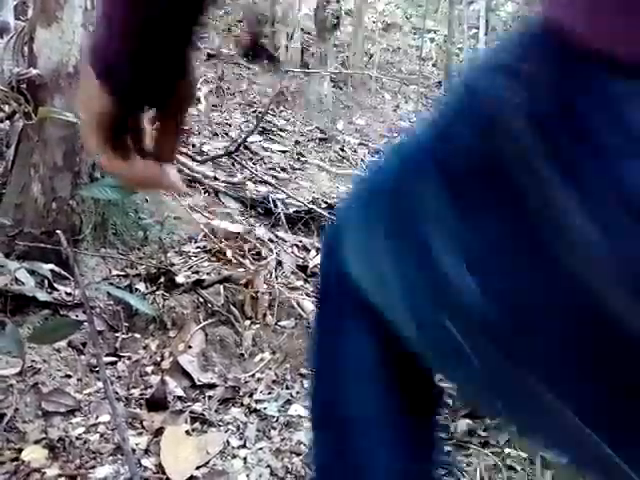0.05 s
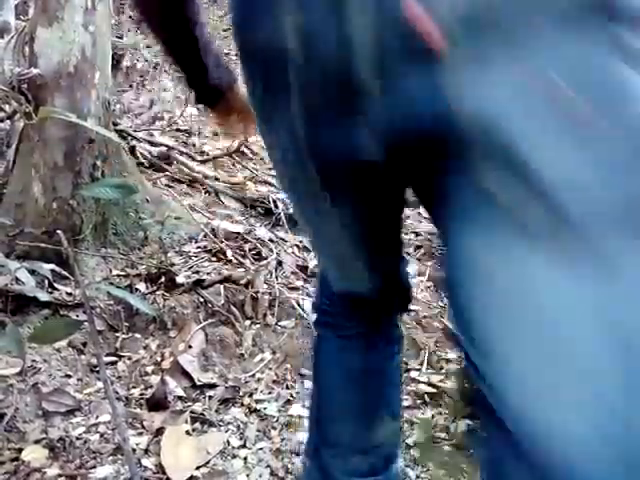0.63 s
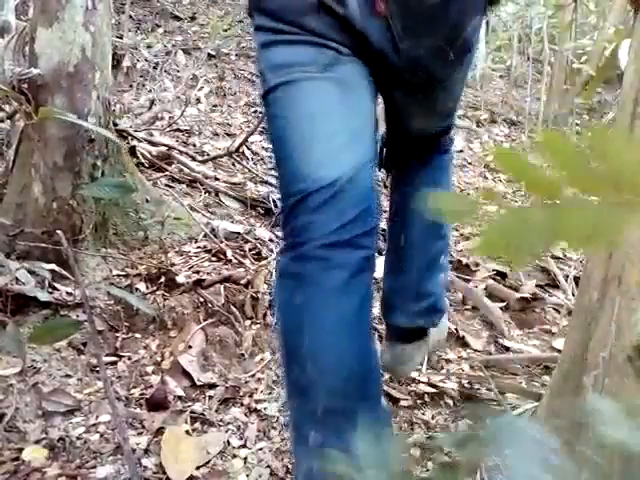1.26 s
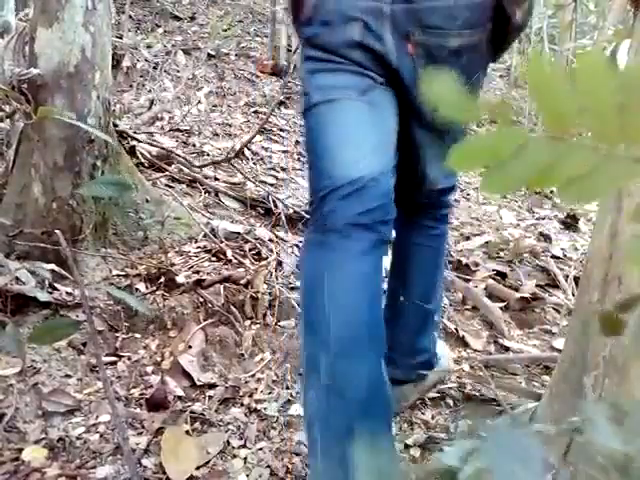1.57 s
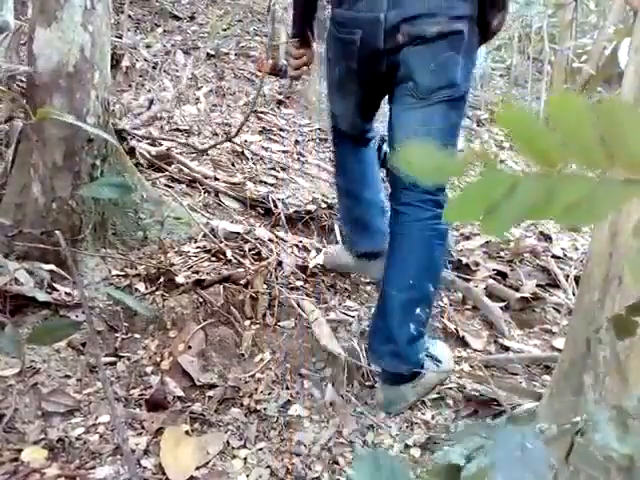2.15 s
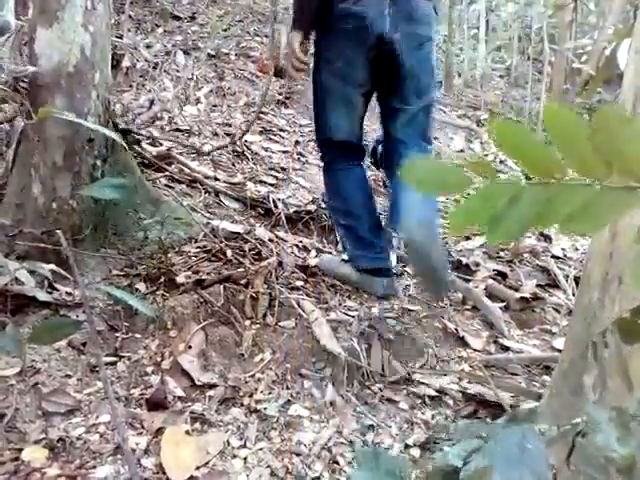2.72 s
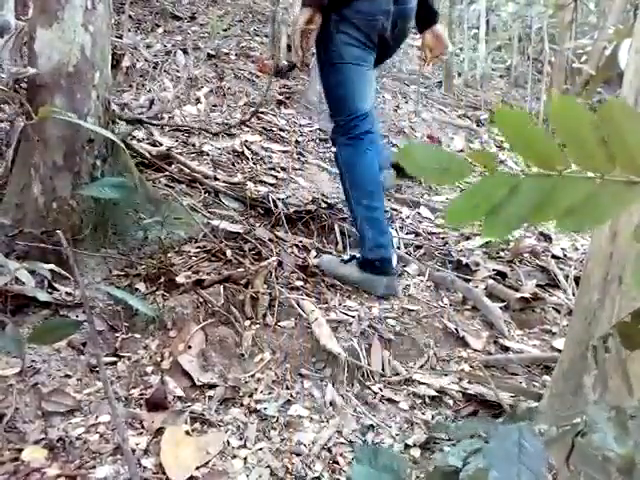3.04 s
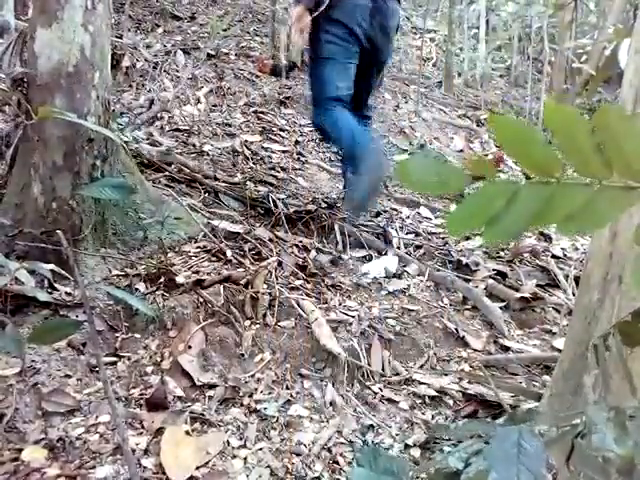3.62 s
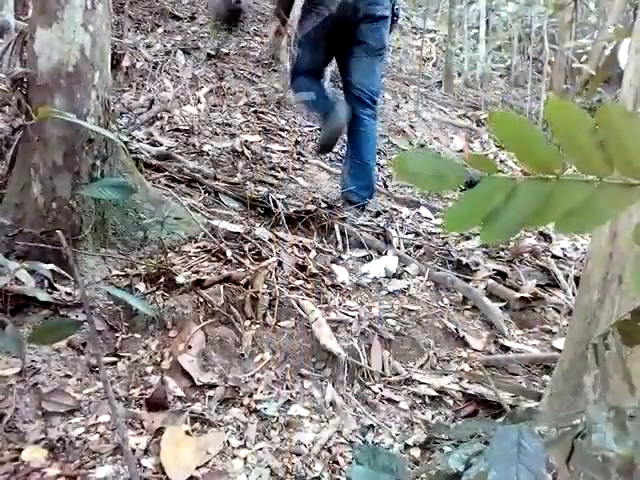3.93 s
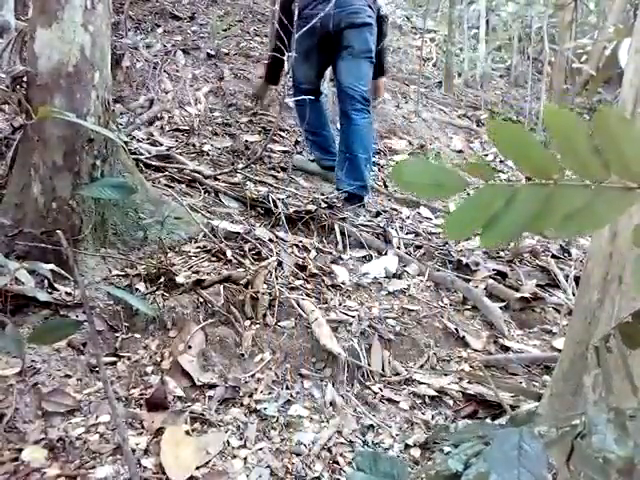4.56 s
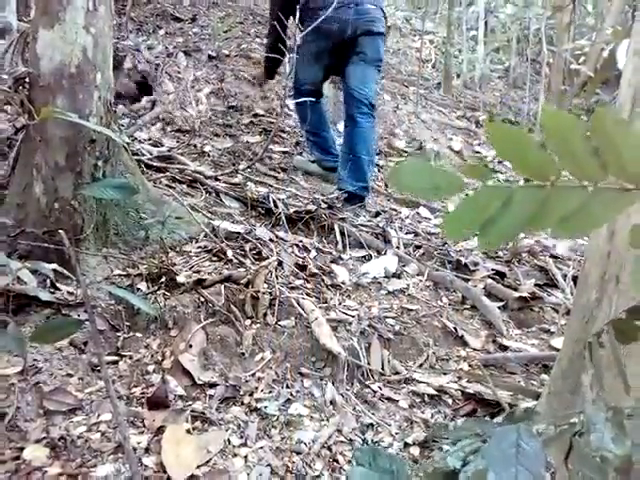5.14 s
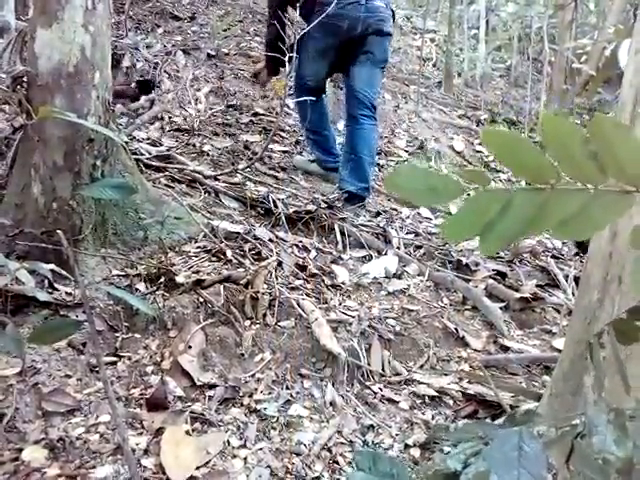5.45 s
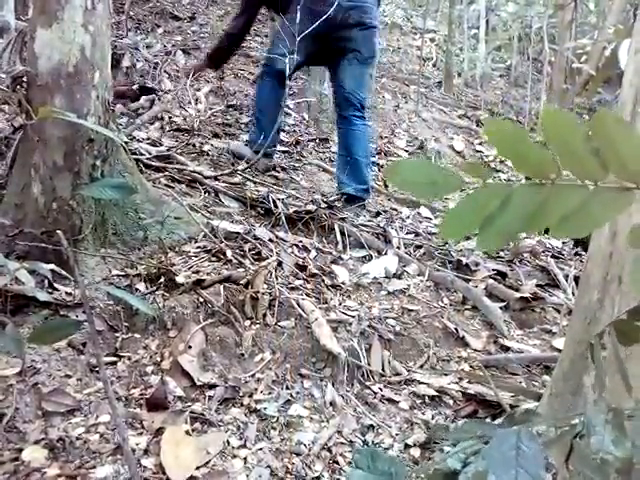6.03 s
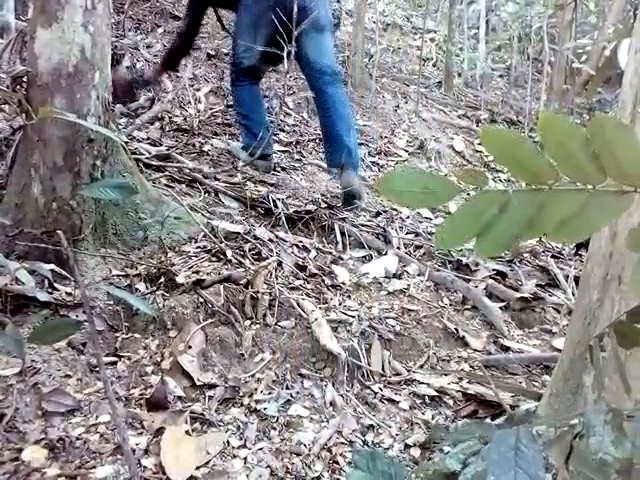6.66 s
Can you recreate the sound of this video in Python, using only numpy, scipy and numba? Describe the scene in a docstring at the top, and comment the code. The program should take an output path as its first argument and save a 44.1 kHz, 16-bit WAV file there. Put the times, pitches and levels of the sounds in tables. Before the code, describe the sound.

In a forest with a faint, steady insect hiss and thin whistling notes, a bird squawks once amid low rushes of air from wings and passing legs. Close footsteps crush dry leaves and break twigs, loudest in the first second, then recede into light rustles and occasional snaps. The bird carries on with short, quick alarm clucks almost to the end. One microphone picks it all up, with a thin echo off the trunks.

```python
"""Forest slope: a snared wild fowl squawks, beats its wings, then clucks in alarm while someone
strides past and up close through dry leaves and twigs. The voice is syrinx pulses through throat
resonances; the litter is tiny fractures, snaps and dull blows; wings and legs push low gusts.
Insects hiss and whistle; the trunks give a thin echo. One microphone."""
import sys
import numpy as np
from scipy import signal
from scipy.fft import rfft, irfft
from scipy.io import wavfile
from scipy.ndimage import uniform_filter1d
from numba import njit

SR = 44100
rng = np.random.default_rng(int(sys.argv[2]) if len(sys.argv) > 2 else 0)


def store_wav(level_fs):
    """Save 16-bit WAV to argv[1]."""
    pcm = np.round(np.clip(np.atleast_2d(level_fs), -1, 1) * 32767)
    wavfile.write(sys.argv[1], SR, pcm.T.astype(np.int16))


N = 298998

# alarm calls: middle_s, relative_db, brightness_db
CLUCKS = [(1.08, -38.5, 12), (1.239, -44.0, -1), (1.369, -46.5, 1.5), (1.606, -40.0, 8), (1.896, -43.5, -4),
          (2.096, -45, 0), (2.402, -41.5, 4), (2.582, -39.0, -2), (2.753, -40, 0), (2.965, -38.0, -1),
          (3.166, -40.5, -3), (3.537, -39.0, -1), (3.73, -42.5, 3), (3.913, -42, -2), (4.082, -42.5, 5),
          (4.259, -40.5, -1), (4.457, -41.5, -1), (4.658, -43.0, 0), (5.173, -45.5, -5), (5.385, -43, 0),
          (5.591, -43.0, -1.5), (5.784, -45.5, -4), (5.974, -45.0, -4.5), (6.174, -44.5, -4.5),
          (6.378, -45, -4)]
# syrinx, beak shut / open: base_hz, effort_hz_per_db, sag_hz_per_s
SHUT_PITCH = (392, 9, 29)
OPEN_PITCH = (266, 3.1, 7.2)
# throat resonances, beak shut / open / squawking: centre_hz, width_hz, gain_db
SHUT_THROAT = [(474, 134, 4.5), (900, 370, 1), (1370, 180, 5.5)]
OPEN_THROAT = [(492, 76, -9.5), (966, 113, 6.5), (1335, 122.4, 2.5), (2470, 127, -13.5), (3960, 300, -9),
               (5390, 310, -8.5)]
SQUAWK_THROAT = [(990, 210, -9.5), (1600, 110, -0.5), (2240, 330, -8), (3130, 200, -11), (4150, 300, 1),
                 (5740, 1000, -8)]
# beak filter: freq_hz, gain_db
SHUT_BEAK = [(150, -34), (300, 19), (1500, 0.5), (2400, -3.5)]
OPEN_BEAK = [(700, -3.5), (1400, -3), (1900, 6), (2800, -1), (5400, 0), (7500, -31)]
# feet and wings sweeping leaves: peak_s, level_db, rise_s, fall_s
SWEEPS = [(.13, -41, 0.18, 0.14), (.58, -33.5, 0.12, 0.31), (.78, -38, 0.28, 0.32),
          (1.159, -41.5, 0.2, 0.15), (1.58, -49.5, 0.43, 0.84), (2.25, -51, 0.099, 0.079),
          (2.53, -49.5, 0.095, 0.048), (3.8, -48.5, 0.71, 0.12), (4.22, -58, 0.88, 0.9)]
# shoes crushing litter: start_s, relative_db, fade_s
CRUNCHES = [(0.464, -26, 0.011), (0.538, -29, 0.015), (0.578, -34, 0.0089), (0.659, -36.5, .025),
            (0.712, -29.5, 0.019), (0.756, -34, 0.02), (0.811, -32.5, 0.053), (1.444, -39, 0.062),
            (2.465, -40.5, 0.041), (3.308, -42, 0.042), (3.678, -45, 0.079)]
# twigs and stiff leaves breaking: start_s, peak_db, body_db
SNAPS = [(0.0466, -18, 1), (0.057, -17, 4), (0.0886, -14, 3), (0.38, -31, 19.5), (.467, -6.5, -1),
         (0.5251, -19, 16.5), (0.5453, -19.5, 15), (.608, -14.5, -1), (.625, -22, 2), (0.6555, -10.5, 9.5),
         (.701, -16, 5), (0.722, -20, 13), (.769, -22, 3), (1.07, -25.5, 0), (1.749, -26, 3),
         (1.8368, -29.5, -32), (2.244, -30.5, 10), (2.5545, -31, 7), (3.894, -28, -3)]
# blows on the ground: start_s, level_db, pitch_hz, grit_db
THUDS = [(.423, -31.5, 320, -1.5), (.474, -29.5, 300, -12), (0.585, -22, 264, -24), (0.62, -21.5, 167, -13),
         (.722, -25, 262, -4), (0.784, -26.5, 240, -9), (2.242, -38.5, 555, -15), (3.33, -41.5, 322, -4),
         (3.726, -39, 191, -3), (6.513, -40, 152, -13.5), (6.563, -28.5, 223, -4.5)]
# air pushed by legs and wings: peak_s, level_db
GUSTS = [(0.051, -40), (.61, -38.5), (.76, -40.5), (3.34, -62), (3.69, -56), (6.54, -51)]
# narrow hisses, among them a short dry insect rasp: peak_s, level_db, rise_s, fall_s, centre_hz,
# filter_width_hz
HISSES = [(3.17, -53.5, 0.08, 0.091, 960, 576), (5.073, -54.5, .012, 0.12, 6000, 1470),
          (6.595, -49.5, 0.055, 0.056, 4760, 1820)]
# insect notes: start_s, end_s, pitch_hz, level_db
WHISTLES = [(-.3, .48, 3100, -54), (.55, 1.05, 3115, -58), (0, 1.7, 2995, -68), (2.6, 4.2, 2995, -66),
            (3.08, 3.46, 3085, -55), (3.6, 4.08, 3105, -55), (5.08, 6.12, 2980, -68),
            (6.12, 7, 2995, -67.5), (5.42, 6.06, 3102, -54), (6.01, 6.5, 3118, -53.5), (6.45, 7, 2905, -61)]
# their partials: harmonic, gain_db
WHISTLE_PARTIALS = [(1, 0.5), (2, -1), (4, -10.5)]
# steady crickets: centre_hz, filter_width_hz, level_db
CRICKETS = [(6400, 12, -65.5), (6574, 47, -63.5)]
# spectra: freq_hz, gain_db
LEAF_SPECTRUM = [(200, -21), (500, -13), (1200, -9.5), (2000, -13), (3100, -9), (4200, -4.5), (5500, 2),
                 (6400, 0.5), (7300, -14), (9000, -26.5), (12500, -40), (15500, -26.5)]
TWIG_SPECTRUM = [(300, -12.5), (1200, -16), (3000, -10.5), (4300, 1), (5600, 8), (6500, 0.5), (7500, -16.5),
                 (10000, -26.5), (15500, -29.5)]
GUST_SPECTRUM = [(25, -58), (60, -7), (120, -2), (250, -6.5), (380, -10), (600, -30.5), (1200, -26.5),
                 (3000, -40)]
CHORUS_SPECTRUM = [(3000, -29), (4200, -27.5), (4650, -3), (5400, -10), (7000, -6), (7700, 2), (9000, -6),
                   (10300, -30.5), (15500, -73)]
RUMBLE_SPECTRUM = [(25, -24), (60, -7.5), (125, -5.5), (300, -13.5), (1000, -26.5), (2000, -31),
                   (4000, -41), (6000, -43)]
SOIL_SPECTRUM = [(120, -14), (330, 0), (700, 2), (1500, -18)]
GRIT_SPECTRUM = [(900, 8), (1600, -4), (3000, -35)]
ECHO_SPECTRUM = [(1400, 0.5), (1800, 6), (4300, 8.5), (10000, -15)]


def clucks(length_s=.052, lead_s=.031, beak_opens_s=2.3, chest_db=-19):
    """Louder clucks are higher; pitch sags as the bird tires; throat resonances arch with each call."""
    out = np.zeros(N)
    first_s, mean_db = CLUCKS[0][0], np.mean(CLUCKS, axis=0)[1]
    for s, db, brightness_db in CLUCKS:
        if s > beak_opens_s:
            pitch, throat, beak, breath = OPEN_PITCH, OPEN_THROAT, OPEN_BEAK, .45
        else:
            pitch, throat, beak, breath = SHUT_PITCH, SHUT_THROAT, SHUT_BEAK, .55
        base_hz, effort_hz_per_db, sag_hz_per_s = pitch
        hz = base_hz + effort_hz_per_db * (db - mean_db) - sag_hz_per_s * (s - first_s)
        source = syrinx(hz, length_s, jitter=.035, breath=breath,
                        rise=rng.uniform(.3, .6), bend=rng.uniform(.12, .36))
        stretch = arch(length_s, bend=.11) * rng.uniform(.97, 1.03)
        voice = sum((-1) ** k * undb(gain_db) * resonate(source, centre_hz * stretch, float(width_hz))
                    for k, (centre_hz, width_hz, gain_db) in enumerate(throat))
        voice = colour(colour(voice, beak), [(700, 0.014), (1350, brightness_db)])
        chest = undb(chest_db) * unit(ring(source, [(246, 350, 0)]))
        add(out, s - lead_s, undb(db - 7) * unit(unit(voice) + chest))
    return out


def squawk(start_s=.107, level_db=-33):
    """One harsh cry of fright: jittery pulses through a stretched throat."""
    out = np.zeros(N)
    source = syrinx(hz=560, length_s=.049, jitter=.2, breath=.56, rise=.21, bend=.2)
    cry = colour(ring(source, SQUAWK_THROAT), [(400, -31), (1000, 2)])
    add(out, start_s, undb(level_db) * unit(cry))
    return out


def syrinx(hz, length_s, jitter, breath, rise, bend):
    """A swell of uneven pulses, slow at first; a puff of air follows each."""
    progress = np.arange(SR // 8) / SR / length_s
    shake, air = rng.standard_normal((2, len(progress)))
    wobble = jitter * unit(uniform_filter1d(shake, size=150))
    cycles = np.cumsum(hz * (arch(length_s, bend) + wobble)) / SR
    pulses = np.diff(np.floor(cycles), prepend=0) * undb(2 * shake)
    puffs = air * (1 - cycles % 1) ** 2
    envelope = np.clip(progress / rise, 0, 1) * np.clip((1 - progress) / .34, 0, 1)
    return envelope * (unit(pulses - pulses.mean()) + breath * unit(puffs))


def leaves(twigs_per_s=56, twig_db=-7.5, soil_db=-19):
    """Swept leaves rustle and small twigs tick; under a shoe, leaves crunch and soil gives way."""
    stir = np.sqrt(sum((undb(db) * swell(s, rise_s, fall_s)) ** 2 for s, db, rise_s, fall_s in SWEEPS))
    rustle = crackle() * undb(3.13 * wander(70))
    breaks = (rng.random(N) < twigs_per_s / SR) * rng.random(N)
    ticks = undb(twig_db) * unit(colour(breaks, TWIG_SPECTRUM))
    weight, t = np.zeros(N), np.arange(SR // 2) / SR
    for s, db, fade_s in CRUNCHES:
        add(weight, s, undb(db + 5) * np.minimum(3 * t / fade_s, 1) * np.exp(-t / fade_s))
    crunch = unit(colour(crackle(), [(1200, 5), (4500, 2)]))
    soil = undb(soil_db) * noise(SOIL_SPECTRUM)
    return stir * (rustle + ticks) + weight * (crunch + soil)


def crackle(cracks_per_s=3000, spread_db=2.5):
    """Tiny leaf fractures, a few much louder than the rest, over a sliding hiss."""
    cracks = (rng.random(N) < cracks_per_s / SR) * rng.choice([-1, 1], N)
    strength = undb(spread_db * np.minimum(rng.exponential(size=N), 4.5))
    hiss = 1.02 * rng.standard_normal(N)
    return unit(colour(unit(cracks * strength) + hiss, LEAF_SPECTRUM))


def snaps(splinter_s=.0014, shiver_s=.044, shiver_db=-21, body_below_hz=3500):
    """A twig splinters sharply; the leaves around it shiver."""
    out, t = np.zeros(N), np.arange(SR // 16) / SR
    envelope = np.exp(-t / splinter_s) + undb(shiver_db) * np.exp(-t / shiver_s)
    for s, peak_db, body_db in SNAPS:
        spectrum = [(hz, db + body_db * (hz < body_below_hz)) for hz, db in TWIG_SPECTRUM]
        snap = colour(rng.standard_normal(len(t)) * envelope, spectrum)
        add(out, s, undb(peak_db) * snap / np.abs(snap).max())
    return out


def thuds(t60_s=.032):
    """Gritty blows that the soil damps at once."""
    out, t = np.zeros(N), np.arange(SR // 8) / SR
    for s, db, hz, grit_db in THUDS:
        grit = undb(grit_db) * noise(GRIT_SPECTRUM, len(t))
        add(out, s, undb(db - 60 * t / t60_s) * (grit - np.sin(2 * np.pi * hz * t)))
    return out


def gusts(rise_s=.052, fall_s=.1):
    """Low rushes of air from wings and passing legs."""
    push = sum(undb(db) * swell(s, rise_s, fall_s) for s, db in GUSTS)
    return noise(GUST_SPECTRUM) * push * undb(2 * wander(60))


def hisses():
    """Brief narrow hisses that swell and trail off."""
    return sum(undb(db) * swell(s, rise_s, fall_s) * narrow_noise(hz, width_hz)
               for s, db, rise_s, fall_s, hz, width_hz in HISSES)


def insect_whistles(flat=.009, settle_s=.303, rise_s=.28, stop_s=.13):
    """Thin notes start flat, swell as they creep up to pitch, then stop short."""
    out, t = np.zeros(N), np.arange(N) / SR
    for start_s, end_s, hz, db in WHISTLES:
        droop = flat * np.exp(-np.maximum(t - start_s, 0) / settle_s)
        pitch_hz = hz * (1 - droop + .00136 * wander(120))
        phase = 2 * np.pi * np.cumsum(pitch_hz) / SR
        tone = sum(undb(gain_db) * np.sin(k * phase) for k, gain_db in WHISTLE_PARTIALS)
        gate = np.clip(np.minimum((t - start_s) / rise_s, (end_s - t) / stop_s), 0, 1)
        out += gate * undb(db + 2 * wander(50)) * tone
    return out


def forest(chorus_db=-55, rumble_db=-66.5):
    """Far insect chorus, faint rumble of air, two cricket notes."""
    chorus = noise(CHORUS_SPECTRUM) * undb(chorus_db + .34 * wander(40) + .74 * wander(2.07))
    rumble = noise(RUMBLE_SPECTRUM) * undb(rumble_db + .94 * wander(8.3))
    crickets = sum(undb(db) * narrow_noise(hz, width_hz) for hz, width_hz, db in CRICKETS)
    return chorus + rumble + crickets


def trunk_echoes(x, gap_s=.011, t60_s=.31):
    """Sparse echoes off trunks; the pattern shifts every 0.2 s as bird and walker move."""
    out, hop = np.zeros(N), SR // 5
    t = np.arange(SR // 2) / SR
    decay = undb(-60 * t / t60_s) * (t > gap_s)
    for i in range(0, N, hop):
        echoes = rng.standard_normal(len(t)) * (rng.random(len(t)) < .05) * decay
        add(out, i / SR, signal.fftconvolve(x[i:i + hop], echoes / np.sqrt(np.sum(echoes ** 2))))
    return colour(out, ECHO_SPECTRUM)


def arch(length_s, bend, crest=.6):
    """Factor rising from 1 - bend to 1 at the crest of a call, then sinking a little."""
    progress = np.minimum(np.arange(SR // 8) / SR / length_s, 1)
    return 1 - np.clip(bend * (progress / crest - 1) ** 2, 0, .5)


def swell(peak_s, rise_s, fall_s):
    """Exponential rise to 1, then decay."""
    t = np.arange(N) / SR - peak_s
    return np.exp(-np.minimum(np.maximum(-t / rise_s, t / fall_s), 20))


def wander(rate_hz):
    """Smooth random drift, rms 1."""
    hold = max(int(SR / rate_hz), 1)
    steps = np.repeat(rng.standard_normal(N // hold + 1), hold)
    return unit(uniform_filter1d(steps, hold)[:N])


def noise(spectrum, samples=N):
    """Coloured noise, rms 1."""
    return unit(colour(rng.standard_normal(samples), spectrum))


def narrow_noise(hz, width_hz):
    """Noise twice through one resonance, rms 1."""
    mode = [(hz, width_hz, 0)]
    return unit(ring(ring(rng.standard_normal(N), mode), mode))


def colour(x, spectrum, size=2048):
    """Minimum-phase filter through points of freq_hz, gain_db."""
    hz, db = np.transpose(spectrum)
    bins_hz = np.arange(size // 2 + 1) * SR / size
    gain = undb(np.interp(np.log(bins_hz + 1), np.log(hz), db))
    cepstrum = irfft(np.log(gain))[:size // 2]
    cepstrum[1:] *= 2
    return signal.fftconvolve(x, irfft(np.exp(rfft(cepstrum, size))))[:len(x)]


def ring(x, modes):
    """Parallel resonances of alternating sign."""
    return sum((-1) ** k * undb(db) * signal.lfilter(*signal.iirpeak(hz, hz / width_hz, SR), x)
               for k, (hz, width_hz, db) in enumerate(modes))


@njit
def resonate(x, hz, width_hz):
    """Band-pass with a moving centre."""
    y, band, low = np.empty(len(x)), 0., 0.
    for i in range(len(x)):
        g, damping = np.tan(np.pi * hz[i] / SR), width_hz / hz[i]
        v = (band + g * (x[i] - low)) / (1 + g * (g + damping))
        band, low, y[i] = 2 * v - band, low + 2 * g * v, damping * v
    return y


def undb(db):
    """Decibels to gain."""
    return 10 ** (np.asarray(db) / 20)


def unit(x):
    """Scale to rms 1."""
    return x / np.sqrt(np.mean(x ** 2) + 1e-20)


def add(out, start_s, x):
    """Mix x into out."""
    i = max(int(start_s * SR), 0)
    out[i:i + len(x)] += x[:max(N - i, 0)]


def scene():
    """Bird up among the trees; litter nearer and drier."""
    bird = clucks() + squawk()
    litter = leaves() + snaps()
    mono = bird + litter + thuds() + gusts() + hisses() + insect_whistles() + forest()
    mono += trunk_echoes(undb(-12) * bird + undb(-16.5) * litter)
    return np.array([mono, mono])


def record(dry, low_hz=45, top_hz=15800):
    """A small microphone loses the deepest bass; a steep low-pass cuts the top."""
    thin = signal.sosfilt(signal.butter(2, low_hz, "high", fs=SR, output="sos"), dry)
    return signal.sosfilt(signal.ellip(8, .2, 70, top_hz, fs=SR, output="sos"), thin)


dry = scene()
out = record(dry)
store_wav(out)
```